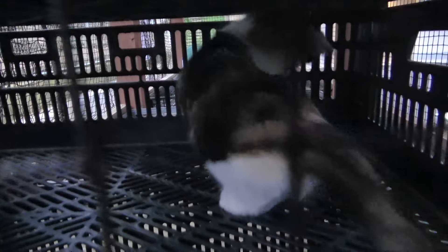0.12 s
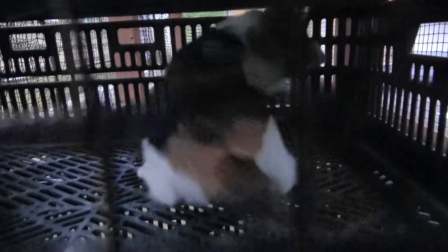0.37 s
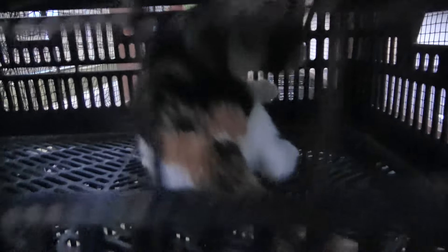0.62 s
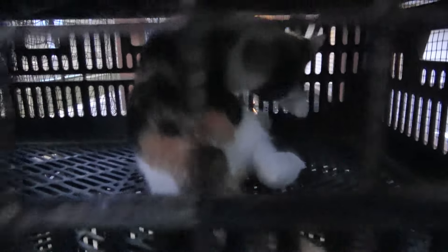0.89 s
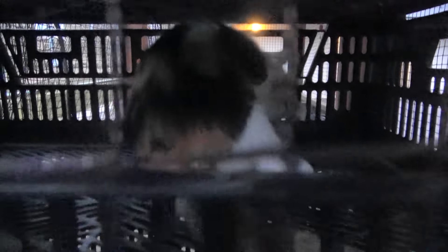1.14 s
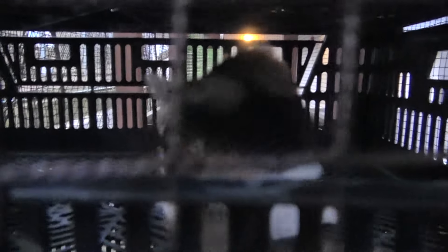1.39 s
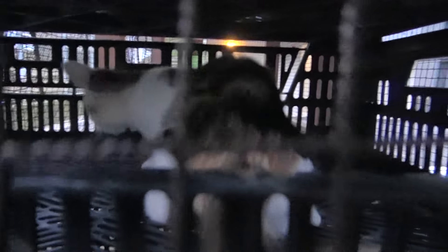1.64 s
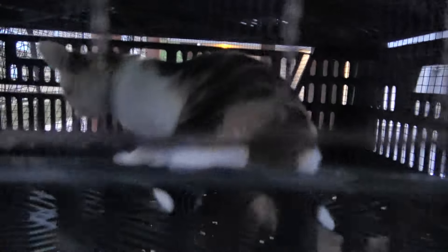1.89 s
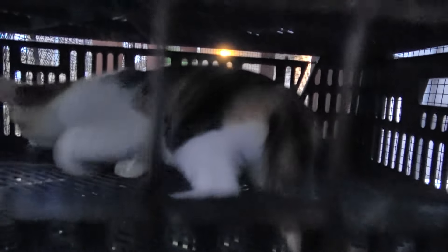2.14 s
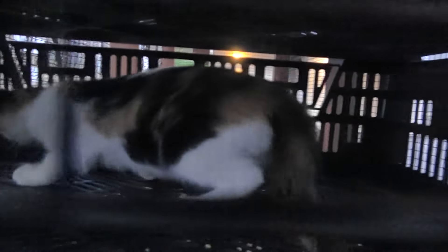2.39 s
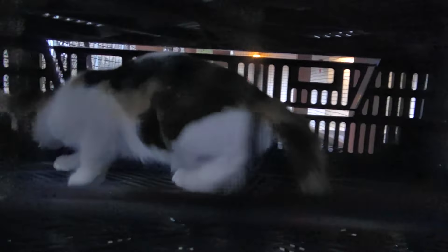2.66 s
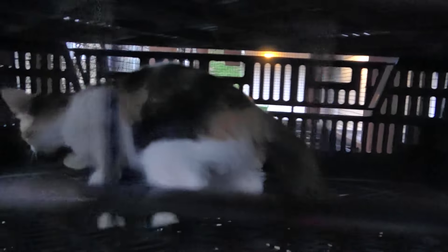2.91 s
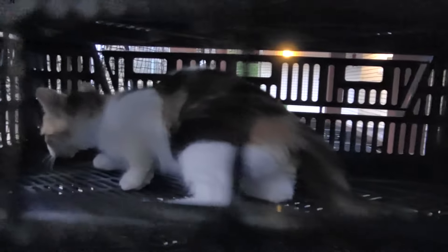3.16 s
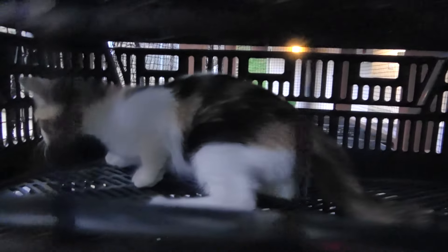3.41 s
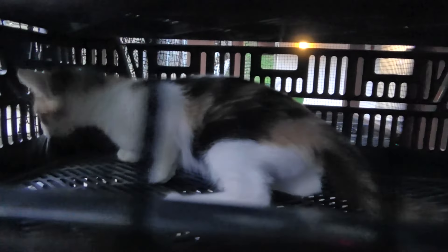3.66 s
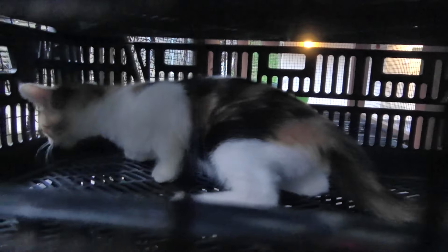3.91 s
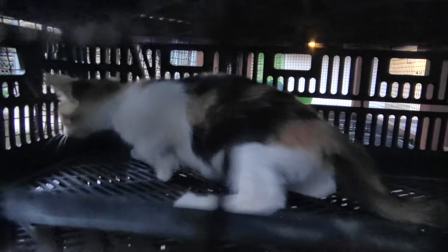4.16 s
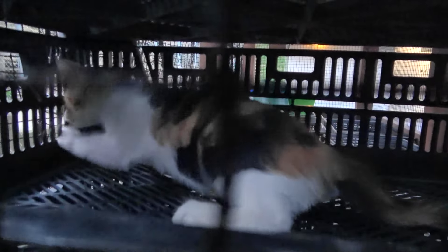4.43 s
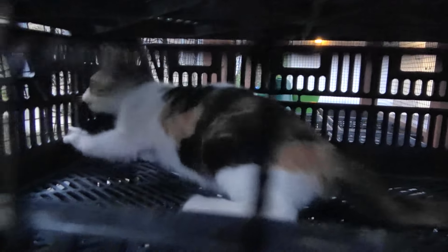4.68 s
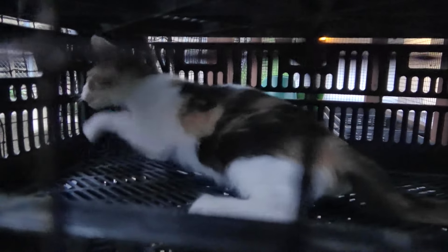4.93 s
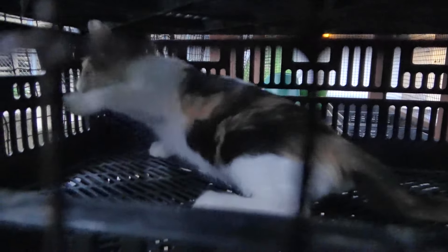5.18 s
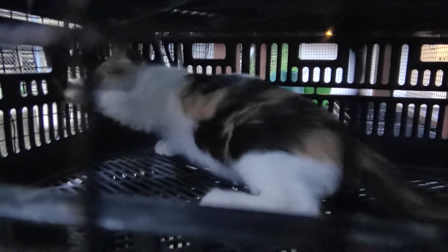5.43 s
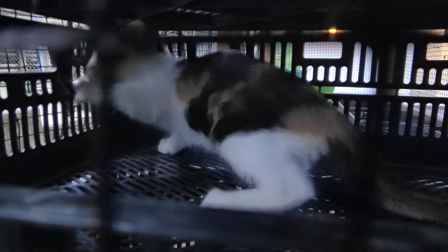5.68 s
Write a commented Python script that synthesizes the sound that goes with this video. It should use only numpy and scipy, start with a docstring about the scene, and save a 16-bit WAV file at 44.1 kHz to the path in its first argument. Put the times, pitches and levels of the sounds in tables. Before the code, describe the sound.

A dense, high cicada hiss fills the stereo width throughout, with one nearer cicada throbbing about eleven times a second and a very high katydid rasping faster. A cat's paws tap a hollow plastic crate at the start, around the middle and more often near the end. A distant engine revs up and fades midway over faint traffic rumble. Outdoors, stereo microphone near the crate.

```python
"""Evening insects round a plastic crate

A far wash of cicadas spreads across the stereo pair, with one throbbing cicada, a chirping katydid and a buzzer
that soon fades: all are click trains or shaped noise. A cat in the crate knocks and scrapes the plastic,
rattles of ticks that ring its modes. A small engine revs far off, its roar and gear whine from the right,
its firing tones from the left. Behind it all lie traffic rumble and a hum, both filtered noise.
"""
import sys
import numpy as np
from scipy import signal
from scipy.io import wavfile
from scipy.ndimage import uniform_filter1d

SR = 44100
rng = np.random.default_rng(int(sys.argv[2]) if len(sys.argv) > 2 else 0)


def bounce(signal):
    """Save signal as a 16-bit WAV file at the path given by the first command-line argument."""
    frames = np.transpose(np.atleast_2d(signal))
    limited = np.clip(frames, -1, 1)
    pcm = np.round(limited * 32767).astype(np.int16)
    wavfile.write(sys.argv[1], SR, pcm)


def how_loud(loudness_db):
    """Turn decibels into a plain amplitude multiplier (0 dB gives 1, 20 dB gives 10)."""
    steps = np.asarray(loudness_db, float) / 20
    return 10 ** steps


N = 256220  # length [samples]

# Far wash of cicadas: (time [s], level [dB], centre of the bright band [Hz], left minus right [dB])
WASH = [(0, -21, 8130, -1), (.86, -22, 8040, -1.5), (2.14, -21.5, 8020, -1.5), (3.06, -23, 7640, -1),
        (5.81, -22.5, 7500, -.5)]
# Spectrum of the wash: (frequency [Hz], relative density [dB])
WASH_SPECTRUM = [(3700, -45), (4200, -20), (4550, -16.5), (4900, -7), (5600, -3), (6800, -3), (8500, -3.5),
                 (9500, -11.5), (10500, -14.5), (12000, -13.5), (13500, -12), (16000, -13.5)]
# Single voices in the wash: (click rate [1/s], body resonance [Hz], width [Hz], mean level before scatter [dB])
WASH_VOICES = [(249.7, 7350, 1200, -47.5), (296.5, 8300, 540, -45), (339, 7970, 1900, -42.5),
               (417, 8400, 1540, -41), (228.8, 6570, 1500, -41.5)]


def chorus():
    """Many far cicadas blur into a hiss whose bright band drifts; a few voices shimmer through, waxing and waning."""
    def shape(hz, t):
        centre_hz = follow(WASH, t)[1]
        bright = how_loud(-0.5) * np.exp(-((hz - centre_hz) / 800) ** 2)
        return how_loud(read(WASH_SPECTRUM, hz)) * (1 + bright)

    level_db, _, lean_db = follow(WASH, np.arange(N) / SR)
    likeness = [(5000, 0.86), (8000, 0.52), (13000, 0.56)]  # (frequency [Hz], left-right likeness)
    hiss = noise(shape, size=256, same=likeness, patchy_db=1.26, patch_s=0.045, patch_hz=500)
    sound = how_loud(level_db) * hiss
    for per_s, body_hz, width_hz, db in WASH_VOICES:
        wander = uniform_filter1d(uniform_filter1d(rng.standard_normal(N), 6000), 6000)
        wax_db = 3 * evened(wander)
        clicks = comb(per_s, jitter=0.006, low_hz=5500, top_hz=9800, drift_s=0.06)
        voice = evened(resonate(clicks, body_hz, width_hz))
        sound += echoes(how_loud(db + wax_db) * voice, t60=0.12, wet_db=3)
    return panned(sound, lean_db)


# Resonances of the tymbal: (frequency [Hz], width [Hz], relative level [dB])
TYMBAL_MODES = [(4780, 180, -1.5), (5428, 340, 6.5), (5860, 250, 5.5), (6900, 340, -30.5),
                (10930, 590, -13)]
# Drifting throb rate: (time [s], rate [1/s])
THROB_RATE = [(0, 10.12), (1.2, 11.23), (2.2, 10.235), (2.9, 11.055), (5.81, 11.03)]
# Strength of the throbs: (time [s], relative level [dB])
THROB_STRENGTH = [(0, 1.5), (.9, 3.5), (1.5, 5), (2.6, 5.5), (3.8, 4.5), (4.6, 2.5), (5.81, 2)]
# Place of the cicada in the stereo pair: (time [s], left minus right [dB])
CICADA_PLACE = [(0, -5), (1, -0.5), (3, -4), (4, -4.5), (5.81, -6)]


def cicada():
    """Steady clicks ring the tymbal; the body pumps some eleven times a second, moving leaves fade single overtones."""
    def leaves(hz, t):
        flicker = uniform_filter1d(rng.standard_normal((len(t), len(hz))), 90, 0)
        fades = uniform_filter1d(flicker, 3, 1).T
        return how_loud(1.3 * evened(fades))

    t = np.arange(N) / SR
    clicks_per_s = 189.9 + 1.02 * t  # climbs steadily
    clicks = comb(clicks_per_s, jitter=0.00067, low_hz=4590, top_hz=12000)
    ring = evened(sum(how_loud(db) * resonate(clicks, hz, width) for hz, width, db in TYMBAL_MODES))
    throbs = beats(0.0415, THROB_RATE, THROB_STRENGTH, jitter_s=0.004, uneven_db=1.2)
    song = ring * (swells(throbs, t, length_s=0.085) + how_loud(-16))  # never quite silent between throbs
    heard = coloured(echoes(song, t60=0.08, wet_db=-2.5), leaves, size=512)
    return panned(how_loud(-33.5) * heard, *follow(CICADA_PLACE, t))


# Spectrum of the wing: (frequency [Hz], relative level [dB])
WING_SPECTRUM = [(9000, -44), (10300, -4.5), (11500, 2.5), (12700, -2.5), (13600, 8), (14400, 3),
                 (15200, 8.5), (16000, -7)]
# Shift of the stroke's middle by pitch, only the top, above 13.3 kHz, comes later: (frequency [Hz], shift [ms])
STROKE_SHIFT = [(10000, -6), (13300, -7), (16000, 8)]
# Brightness above 14 kHz: (time [s], tilt [dB per kHz])
WING_BRIGHTNESS = [(0, 3), (1, 4), (1.8, 1.2), (3, 0), (5.81, -.3)]
# Drifting stroke rate: (time [s], rate [1/s])
STROKE_RATE = [(0, 16.4), (1, 16.295), (3, 16.37), (4.3, 15.755), (5.81, 15.91)]
# Strength of the strokes: (time [s], relative level [dB])
STROKE_STRENGTH = [(0, 1), (1.5, 0), (2.6, 2.5), (3.6, 1.5), (4.5, 0), (5.81, -2.5)]


def katydid():
    """Each wing stroke scrapes the teeth of a file: clicks and rasp whose top, above 13.3 kHz, comes later."""
    strokes = beats(0.005, STROKE_RATE, STROKE_STRENGTH, jitter_s=0.005, uneven_db=1.1)

    def shape(hz, t):
        tilt_db = follow(WING_BRIGHTNESS, t)[0] * np.maximum(hz - 14000, 0) / 1000
        shift_s = read(STROKE_SHIFT, hz) / 1000
        stroke = swells(strokes, t - shift_s, length_s=0.052, sharpness=1.5)
        return how_loud(read(WING_SPECTRUM, hz) + tilt_db) * stroke

    clicks = comb(340, jitter=0.012, low_hz=8500, top_hz=16500, drift_s=0.08)
    teeth = echoes(clicks, t60=0.02, wet_db=-5)
    rasp = noise(lambda hz, t: 1, size=128, same=[(13000, 0.78)], patchy_db=2.3, patch_s=0.03, patch_hz=900)
    scrape = rasp + how_loud(-8) * teeth
    return panned(how_loud(-27) * coloured(scrape, shape, size=128), -1.5)


# Fading buzzer: (time [s], relative height of the narrow band [dB], relative height of the top band [dB])
BUZZER_BANDS = [(0, -4, -4), (.55, -1.5, -5), (1.08, -2.5, -5), (1.16, -11, -6), (1.7, -32, -7),
                (2.6, -30, -15), (5.81, -34, -15)]


def buzzer():
    """Blurred clicks 370 times a second, mixed with hiss, in a narrow and a high band."""
    def shape(hz, t):
        narrow_db, top_db = follow(BUZZER_BANDS, t)
        narrow = how_loud(narrow_db) * np.exp(-((hz - 12000) / 330) ** 2)
        top = how_loud(top_db) * np.exp(-((hz - 14100) / 900) ** 2)
        return narrow + top

    clicks = comb(370, jitter=0.01, low_hz=10500, top_hz=16500, drift_s=0.04)
    blurred = echoes(clicks, t60=0.05, wet_db=0)
    hiss = noise(lambda hz, t: 1, size=256, same=[(13000, 0.7)], patchy_db=1.5, patch_s=0.05, patch_hz=800)
    buzz = hiss + how_loud(-8) * blurred
    return how_loud(-36) * coloured(buzz, shape, size=256)


# Paws on the crate: (time [s], energy [dB], length of the rattle [s], pitch of the panel struck [Hz],
# fall away from that pitch [dB per octave])
PAW_KNOCKS = [(.086, -8.5, 0.013, 900, 3), (.097, -2, .012, 750, 5), (.36, -10, 0.01, 400, 17),
              (1.245, -16, 0.012, 1100, 15), (3.525, -5, 0.059, 1100, 10), (3.656, -22, 0.0044, 2910, 8),
              (3.682, -12, 0.0041, 2690, 12), (4.46, -8, 0.045, 2300, 3), (4.7757, 3, .016, 600, 3),
              (4.802, -13, 0.0084, 850, 18), (5.313, -8.5, 0.013, 2300, 22),
              (5.37, -11.5, 0.0094, 1920, 26), (5.446, -9, 0.012, 2000, 0.5),
              (5.521, -13.5, 0.019, 2300, 27), (5.629, -17, 0.021, 1250, 17), (5.789, 3, 0.012, 182, 23)]
# Modes of the plastic: (frequency [Hz], relative level [dB], 60 dB decay time [s])
CRATE_MODES = [(109, -9, 0.057), (181, -2.5, 0.16), (364, -6, 0.037), (675, -10, 0.04), (846, -7.5, 0.051),
               (960, -6, 0.029), (1250, -4, 0.014), (1620, -8.5, 0.051), (1840, -7, .025),
               (2300, -8, 0.035), (2560, -8, 0.0059), (3150, 3, 0.014), (3630, 3, 0.014), (4230, -4, 0.016)]


def crate():
    """Each knock is a short rattle of ticks that rings the modes of the plastic."""
    out, t = np.zeros(N + SR), np.arange(SR // 5) / SR
    for s, db, length_s, panel_hz, fall_db in PAW_KNOCKS:
        ticks = np.zeros(SR // 10)
        when = (np.arange(24) + rng.random(24)) / 24  # fraction of the rattle
        rise_fall = np.minimum(when / 0.12, 1) * (1 - 0.85 * when)
        force = rng.choice([-1, 1], 24) * rng.uniform(0.6, 1, 24) * rise_fall
        np.add.at(ticks, (when * length_s * SR).astype(int), force)
        ring = np.zeros(len(t))
        for hz, level_db, t60 in CRATE_MODES:
            mode_db = level_db - fall_db * abs(np.log2(hz / panel_hz))
            ring += how_loud(mode_db - 60 * t / t60) * np.sin(2 * np.pi * hz * t)
        band_hz = [panel_hz * 0.5, min(panel_hz * 2.5, 4600)]
        band = signal.butter(2, band_hz, "band", fs=SR)
        crack = signal.lfilter(*band, rng.standard_normal(len(t)))
        ring += how_loud(8 - 60 * t / 0.0044) * evened(crack)
        knock = signal.fftconvolve(ticks, ring)
        at = round(s * SR)
        out[at:at + len(knock)] += how_loud(db) * knock / np.linalg.norm(knock)
    return panned(echoes(out[:N], t60=0.1, wet_db=-9), -1.4)


# Revving engine: (time [s], firing rate [Hz], level of order 1 [dB], of order 2 [dB], of order 4 [dB])
ENGINE_ORDERS = [(1.9, 38.4, -63, -55, -56), (2.3, 41.33, -58, -43, -50), (2.63, 42.3, -52, -42.5, -47),
                 (3, 43.9, -48, -45, -46.5), (3.4, 44.9, -50.5, -37.5, -51), (3.64, 47.4, -46, -38.5, -59),
                 (3.82, 44.66, -49, -43, -47), (4.25, 42.5, -51, -52.5, -56), (4.6, 40, -72, -68, -62)]
# Broad roar of the engine: (time [s], level [dB])
ROAR_LEVEL = [(0, -83), (1.5, -58), (2.4, -43), (3.4, -44), (4.2, -44.5), (5.81, -57)]
# Gears, heard at two and three times this base: (time [s], base frequency [Hz], level [dB])
GEAR_WHINE = [(3.02, 645, -82), (3.12, 651, -59), (3.4, 655, -54.5), (3.72, 666, -57), (3.85, 650, -66)]


def engine():
    """Low firing orders as tones that fade at both ends; a broad roar and a thin gear whine on the right."""
    t = np.arange(N) / SR
    firing_hz, *levels_db = follow(ENGINE_ORDERS, t)
    inside_s = np.minimum(t - ENGINE_ORDERS[0][0], ENGINE_ORDERS[-1][0] - t)
    fade = np.clip(inside_s / 0.3 + 1, 0, 1)
    turns = np.cumsum(firing_hz) / SR
    tones = sum(np.sqrt(2) * how_loud(db) * np.sin(2 * np.pi * order * turns)
                for order, db in zip((1, 2, 4), levels_db))

    # (frequency [Hz], relative density [dB])
    roar_spectrum = [(120, -10), (220, 3.5), (310, -6.5), (420, -8.0), (700, -8), (1600, -15.5),
                     (2600, -18.5), (4000, -20.5)]
    roar = noise(lambda hz, s: how_loud(read(roar_spectrum, hz)), size=1024, same=[(1000, 0.89)],
                 patchy_db=2.0, patch_s=0.08, patch_hz=300)
    roar = roar * how_loud(*follow(ROAR_LEVEL, t))

    whine_hz, whine_db = follow(GEAR_WHINE, t)
    gears = 2 * np.pi * np.cumsum(whine_hz) / SR
    whine = how_loud(whine_db) * (np.sin(2 * gears) + np.sin(3 * gears))
    return panned(tones * fade, 5.6) + panned(roar + whine, -11.5)


# Spectrum of the traffic: (frequency [Hz], relative density [dB])
RUMBLE_SPECTRUM = [(15, -34), (25, -11.5), (97, -4), (165, -4.5), (204, -3.5), (282, -6), (433, -11),
                   (709, -12.5), (900, -16.5), (1250, -15), (2000, -18), (2700, -18.5), (3300, -23.5),
                   (3700, -22), (4200, -21), (5500, -51), (9000, -84)]
# Place of the traffic in the stereo pair: (frequency [Hz], left minus right [dB])
RUMBLE_PLACE = [(60, 4.5), (110, 4.5), (200, -3), (380, -2.5), (700, -3), (1290, -2), (2380, -4),
                (4400, -8.5), (8120, -0.5), (15000, -1.0)]
# Likeness of the two channels: (frequency [Hz], left-right likeness [0 to 1])
RUMBLE_LIKENESS = [(60, 0.95), (400, 0.95), (800, 0.98), (1400, 0.98), (2400, 0.91)]
# Swell of the rumble below about 130 Hz: (time [s], relative level [dB])
RUMBLE_SWELL = [(0, 3.5), (1, 0), (2, 1), (3.5, -3), (4.5, 1), (5.2, -4), (5.81, 0.5)]
# Fuzzy hum tones: (frequency [Hz], width [Hz], level [dB])
HUM_TONES = [(194.8, 7, -49), (213.65, 7.6, -47), (390.6, 9.1, -56.5), (500, 59, -50), (759, 12, -60.5),
             (1255, 31, -60)]


def background():
    """Traffic rumble, noise with its bass from the left, and a few hum tones of narrowly resonated noise."""
    def shape(hz, t):
        lean_db = np.multiply.outer([0.5, -0.5], read(RUMBLE_PLACE, hz))
        swell_db = follow(RUMBLE_SWELL, t)[0] / (1 + (hz / 130) ** 4)
        return how_loud(read(RUMBLE_SPECTRUM, hz) + lean_db + swell_db)

    rumble = noise(shape, size=2048, same=RUMBLE_LIKENESS, patchy_db=2.0, patch_s=0.15, patch_hz=150)
    hum = sum(how_loud(db) * evened(resonate(rng.standard_normal(N), hz, width)) for hz, width, db in HUM_TONES)
    return how_loud(-38) * rumble + panned(hum, -2.4)


def evened(x):
    """Scales to rms 1."""
    return x / np.sqrt(np.mean(x ** 2) + 1e-20)


def read(points, hz):
    """Reads a spectrum on a log-frequency axis."""
    f, value = np.transpose(points)
    return np.interp(np.log(hz + 1), np.log(f + 1), value)


def follow(rows, t):
    """Every column of a curve at the times t."""
    s, *columns = np.transpose(rows)
    return [np.interp(t, s, c) for c in columns]


def panned(x, lean_db):
    """Leans a sound left (positive) or right (negative) by a level difference."""
    return x * how_loud(np.multiply.outer([0.5, -0.5], lean_db * np.ones(N)))


def resonate(x, hz, width):
    """Shifts hz down to zero, smooths twice, shifts back: a steep resonance."""
    turn = np.exp(2j * np.pi * hz * np.arange(N) / SR)
    r = np.exp(-np.pi * width / SR)
    smoothed = signal.lfilter([(1 - r) ** 2], [1, -2 * r, r * r], x / turn)
    return 2 * (turn * smoothed).real


def noise(shape, size, same, patchy_db, patch_s, patch_hz):
    """Stereo random short-time spectra; shape(hz, t) gives the gain, patches drift over it."""
    hop = size // 4
    t = np.arange(N // hop + 5) * hop / SR
    hz = np.fft.rfftfreq(size, 1 / SR)[:, None]
    a, b, c, d, patches = rng.standard_normal((len(t), len(hz), 5)).T
    for axis, cells in enumerate([patch_hz * size / SR, patch_s * SR / hop]):
        patches = uniform_filter1d(patches, max(round(cells), 1), axis)
    same = np.clip(read(same, hz), 0, 1)
    left = a + 1j * b
    right = same * left + np.sqrt(1 - same ** 2) * (c + 1j * d)
    z = np.array([left, right])
    z *= shape(hz, t) * how_loud(patchy_db * evened(patches))
    return evened(signal.istft(z, nperseg=size, noverlap=size - hop)[1][:, :N])


def coloured(x, shape, size):
    """Multiplies the short-time spectrum of x by shape(hz, t), then scales to rms 1."""
    overlap = size - size // 4
    hz, t, z = signal.stft(x, SR, nperseg=size, noverlap=overlap)
    shaped = z * shape(hz[:, None], t)
    return evened(signal.istft(shaped, nperseg=size, noverlap=overlap)[1][:, :N])


def beats(first_s, pace, effort, jitter_s, uneven_db):
    """Rows (time [s], level [dB]) of a repeated stroke: a drifting pace, a slow effort, a little chance in each."""
    t = np.arange(first_s, N / SR + 0.1, 0.001)
    turns = np.cumsum(follow(pace, t)[0]) * 0.001
    s = np.interp(np.arange(int(turns[-1])), turns, t)
    late, loud = rng.standard_normal((len(s), 2)).T
    return np.transpose([s + jitter_s * late, follow(effort, s)[0] + uneven_db * loud])


def swells(events, t, length_s, sharpness=2):
    """One smooth bump of amplitude round each event time."""
    s, db = np.transpose(events)
    nearest = np.searchsorted((s[1:] + s[:-1]) / 2, t)
    phase = np.clip((t - s[nearest]) / length_s, -0.5, 0.5)
    return how_loud(db[nearest]) * np.cos(np.pi * phase).clip(0) ** sharpness


def comb(per_s, jitter, low_hz, top_hz, drift_s=0.012):
    """Clicks at a slightly unsteady rate: the harmonics between two pitches."""
    wander = evened(uniform_filter1d(rng.standard_normal(N), round(drift_s * SR)))
    turns = np.cumsum(per_s * (1 + jitter * wander)) / SR
    mean = np.mean(per_s)
    harmonics = range(round(low_hz / mean), round(top_hz / mean))
    return evened(sum(np.cos(2 * np.pi * k * turns) for k in harmonics))


def echoes(x, t60, wet_db, size=6000):
    """Direct sound in both channels plus a short scatter, different in each."""
    taps = rng.standard_normal((2, size)) * how_loud(-60 * np.arange(size) / SR / t60)
    taps = taps / np.linalg.norm(taps[0])
    return x + how_loud(wet_db) * signal.oaconvolve(x[None], taps, axes=1)[:, :N]


def scene():
    """Insects, the crate, the distant engine and traffic, summed at the stereo pair."""
    return chorus() + cicada() + katydid() + buzzer() + crate() + engine() + background()


def roll_off(x):
    """The treble ends steeply here."""
    return signal.sosfilt(signal.butter(12, 17020, fs=SR, output="sos"), x)


def record(dry):
    """The microphone channels end in a steep low-pass at 15750 Hz."""
    edge = signal.firwin(2001, 15750, window=("kaiser", 9), fs=SR)
    mix = signal.oaconvolve(dry, edge[None], "same")
    return roll_off(mix)


dry = scene()
out = record(dry)
bounce(out)
```